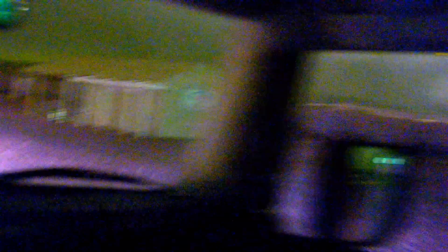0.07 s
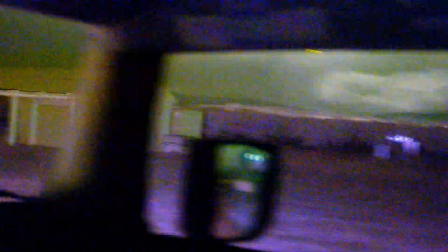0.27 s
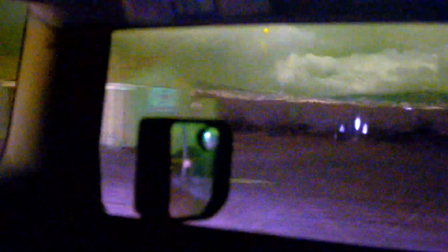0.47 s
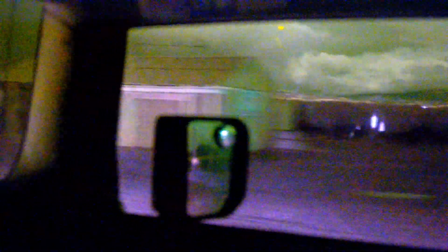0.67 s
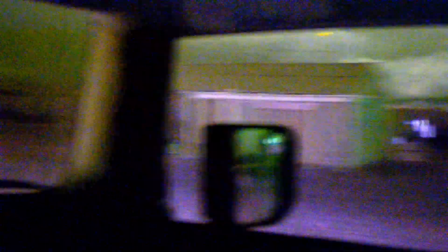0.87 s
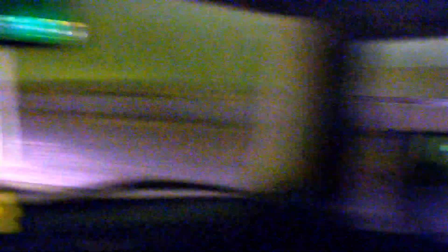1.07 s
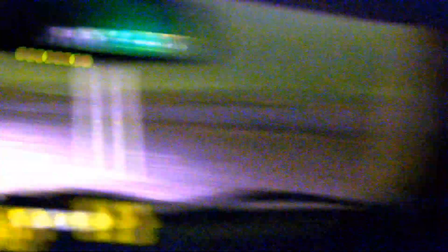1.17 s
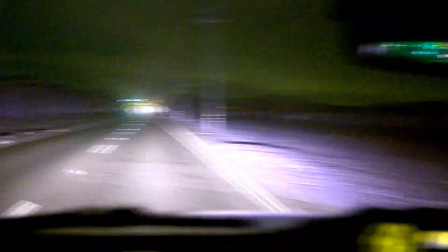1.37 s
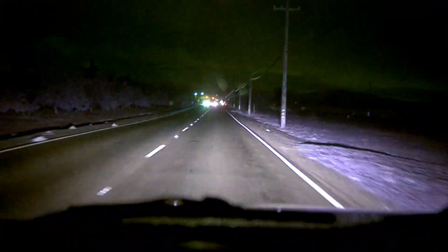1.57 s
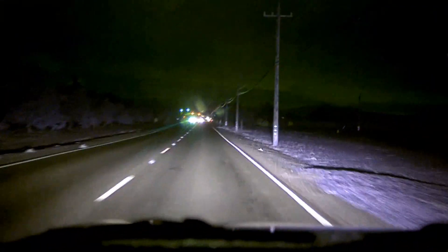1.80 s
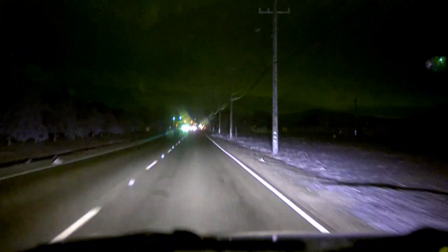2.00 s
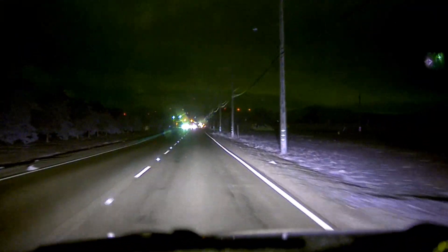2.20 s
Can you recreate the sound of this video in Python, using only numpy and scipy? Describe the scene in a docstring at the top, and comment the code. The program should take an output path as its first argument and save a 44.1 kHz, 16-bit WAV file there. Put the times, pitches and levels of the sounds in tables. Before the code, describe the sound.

Low car engine drone with muffled road and wind noise in a closed cabin, faint fuzzy tyre whine, gentle low thuds, and early light rustles and ticks on a slightly hissy hand-held microphone.

```python
"""Engine orders boom inside a car at road speed, as tones locked to one wandering firing pitch.
Under them lie body rumble and tyre roar with wind hiss, both shaped noise, and soft throbs over bumps.
Resonant noise makes a fuzzy tread whine; a hand rustles, strongest early on, and ticks on the microphone case.
A small hand-held microphone, swung from the side window to the front, adds hiss and limits the band."""
import sys
import numpy as np
from scipy import signal
from scipy.fft import rfft, irfft, next_fast_len
from scipy.io import wavfile
from scipy.ndimage import uniform_filter1d

SR = 44100
rng = np.random.default_rng(int(sys.argv[2]) if len(sys.argv) > 2 else 0)


def natural_amplitude(level_db):
    """Convert a level in decibels to a linear amplitude factor, elementwise."""
    exponent = np.asarray(level_db, float) / 20
    return 10 ** exponent


def to_wav(sig):
    """Store sig (one row per channel, or 1-D mono) as 16-bit WAV at the path in sys.argv[1].

    Samples outside -1..1 are clipped; the rate is SR.
    """
    pcm = np.clip(np.atleast_2d(sig), -1, 1) * 32767
    pcm = np.round(pcm).astype(np.int16)
    wavfile.write(sys.argv[1], SR, pcm.T)  # frames by channels


N = 98916  # length in samples


def evened(x):
    """Scales a signal to rms 1."""
    return x / np.sqrt(np.mean(x ** 2) + 1e-20)


def column(table, index):
    """One column of a time table, interpolated for every sample."""
    rows = np.array(table, float)
    return np.interp(np.arange(N) / SR, rows[:, 0], rows[:, index])


def read(points, hz):
    """Reads a spectrum curve at the frequencies hz, interpolating along log frequency."""
    f, value = np.transpose(points)
    return np.interp(np.log(hz + 1), np.log(f + 1), value)


def coloured(colour):
    """Steady noise of the given spectrum, rms 1."""
    size = next_fast_len(N)
    gain = natural_amplitude(read(colour, np.fft.rfftfreq(size, 1 / SR)))
    noise = irfft(rfft(rng.standard_normal(size)) * gain, size)
    return evened(noise[:N])


def drift(top_hz):
    """Slow random movement from sines up to top_hz, the slower ones stronger; rms 1."""
    t = np.arange(N) / SR
    rates_hz = top_hz * np.geomspace(.05, 1, num=20)
    return evened(sum(np.sin(2 * np.pi * (f * t + rng.random())) / np.sqrt(f) for f in rates_hz))


def resonate(x, hz, width_hz):
    """A resonance of gain 1 that follows hz: shift down to zero frequency, smooth, shift back."""
    turn = np.exp(2j * np.pi * np.cumsum(hz * np.ones(len(x))) / SR)
    r = np.exp(-np.pi * width_hz / SR)
    smooth = signal.lfilter([1 - r], [1, -r], x / turn)
    return 2 * (turn * smooth).real


def engine():
    """Firing tone, its half and faint crankshaft orders share one rotation; each wavers in level."""
    # Engine boom, which dips while the microphone faces the side:
    # (time [s], firing tone [Hz], its level [dB], half tone level [dB])
    boom = [(0, 129.6, -34, -21.5), (.2, 130.1, -27, -26.5), (.45, 129.4, -29, -29.5),
            (.7, 129.5, -33, -28.5), (.95, 129.4, -36, -32.5), (1.15, 128.3, -37.5, -28),
            (1.3, 129, -37, -38.5), (1.45, 128.4, -27.5, -31), (1.7, 129.4, -25.5, -27.5),
            (1.9, 128.6, -24, -27), (2.05, 128.6, -25, -22.5), (2.24, 124, -23.5, -47)]
    # Faint crankshaft orders: (multiple of the firing tone, level [dB])
    faint_orders = [(.75, -40), (1.249, -48.5)]
    waver_db, half_waver_db, faint_waver_db = 1.0, 2.5, 3  # rms
    turns = np.cumsum(column(boom, index=1)) / SR

    def tone(multiple, db):
        phase = 2 * np.pi * (multiple * turns + rng.random())
        return np.sqrt(2) * natural_amplitude(db) * np.sin(phase)

    firing = tone(1, column(boom, index=2) + waver_db * drift(12))
    half = tone(.5, column(boom, index=3) + half_waver_db * drift(15))
    faint = sum(tone(k, db + faint_waver_db * drift(6)) for k, db in faint_orders)
    return firing + half + faint


def rumble():
    """The body shakes more or less as the road surface passes: low noise with a drawn level."""
    # Body rumble over the road surface: (time [s], level [dB])
    surface = [(0, -21.5), (.12, -26.5), (.27, -23.5), (.41, -30), (.49, -23), (.56, -27.5), (.68, -25.5),
               (.85, -26.5), (.94, -29.5), (1.04, -24.5), (1.16, -25), (1.29, -33.5), (1.4, -27),
               (1.47, -44.5), (1.57, -24.5), (1.68, -29), (1.85, -22), (1.96, -31), (2.1, -25), (2.24, -18)]
    # Rumble spectrum: (frequency [Hz], relative density [dB per Hz])
    body_colour = [(3, -17), (10, -15), (18, 0.5), (35, 6.5), (48, 5.5), (56, -4), (65, -4), (74, -12),
                   (90, -26), (150, -71.5)]
    shake = coloured(body_colour)
    # Even out most of the noise's own swelling, so that the drawn level leads
    shake = shake / (uniform_filter1d(shake ** 2, size=3000) + .1) ** .4
    return natural_amplitude(column(surface, index=1)) * evened(shake)


def throbs():
    """Each bump swings the body for a cycle or two: a low sine under a short bell-shaped envelope."""
    # Soft throbs over bumps: (time of the envelope peak [s], its level [dB], pitch [Hz])
    bumps = np.array([(0.027, -15.5, 28.2), (.755, -15, 42), (1.211, -14.5, 37.96), (1.375, -15.5, 44.5),
                      (2.075, -16, 45), (2.118, -16.5, 42.06)])
    rise_s, fall_s = .014, .018  # from the peak to 1/e
    t = np.arange(N)[None] / SR - bumps[:, :1]
    db, hz = bumps[:, 1:2], bumps[:, 2:]
    shape = np.exp(-(t / np.where(t < 0, rise_s, fall_s)) ** 2)
    swing = np.sin(2 * np.pi * (hz * t + rng.random((len(t), 1))))
    return (natural_amplitude(db) * shape * swing).sum(0)


def roar():
    """Tyre and wind noise whose spectrum drifts in patches, with a slow swell and a treble flicker."""
    # Tyre roar and wind through the cabin: (frequency [Hz], relative density [dB per Hz])
    cabin_colour = [(30, -22), (70, -2.5), (85, -2), (100, 2.5), (118, 1.5), (145, -5.5), (175, -7.5),
                    (200, -6), (260, -9.5), (370, -11), (600, -19), (800, -21), (1000, -25), (1650, -31.5),
                    (2800, -34), (3500, -31), (3900, -31.5), (4300, -37), (4700, -45), (5200, -49.5),
                    (6200, -52.5), (9000, -100)]
    level_db = -32.5  # before the swell
    patchy_db, swell_db, flicker_db = 0.5, 1.1, 1  # rms
    frames, hz = N // 256 + 8, np.fft.rfftfreq(1024, 1 / SR)
    patches = uniform_filter1d(rng.standard_normal((frames, 513)), size=14, axis=0)  # over time
    patches = evened(uniform_filter1d(patches, size=12, axis=1))  # over frequency
    # One random step per frame, shared by all frequencies and at full depth from 2 kHz up
    flicker = rng.standard_normal((frames, 1)) * np.clip(hz / 2000, 0, 1)
    field = natural_amplitude(patchy_db * patches + flicker_db * flicker).T
    z = signal.stft(np.pad(coloured(cabin_colour), (0, 1024)), nperseg=1024, noverlap=768)[2]
    x = signal.istft(z * field[:, :z.shape[1]], nperseg=1024, noverlap=768)[1][:N]
    return natural_amplitude(level_db + swell_db * drift(3)) * evened(x)


def whine():
    """Tread blocks sing a fuzzy note: noise through two resonances on one wandering pitch."""
    # Tread whine: (time [s], centre pitch [Hz], level [dB])
    tread = [(0, 743, -49.5), (.4, 740, -51), (.75, 730, -48), (1.1, 715, -49.5), (1.5, 763, -47.5),
             (1.7, 787, -47), (1.95, 758, -50.5), (2.24, 786, -46.5)]
    width_hz, wander_hz = 70, 14  # first resonance; rms wander
    hz = column(tread, index=1) + wander_hz * drift(10)
    note = resonate(rng.standard_normal(N), hz, width_hz)
    note = resonate(note, hz, 2 * width_hz)
    return natural_amplitude(column(tread, index=2)) * evened(note)


def hand():
    """Skin grains and a few soft ticks ring the resonances of the microphone case."""
    # Rustle of the hand on the case: (time [s], level [dB])
    rustle = [(0, -54.5), (.06, -54.5), (.14, -60), (.22, -51), (.27, -55.5), (.38, -53), (.55, -59),
              (.68, -67), (2.24, -72.5)]
    # Case resonances: (frequency [Hz], width [Hz], relative level [dB])
    modes = [(3820, 540, 11.5), (3600, 480, -1.5), (2500, 1300, -6)]
    # Ticks, noise bursts played at half this amplitude: (time [s], level [dB])
    taps = [(0.0644, -38), (0.173, -37.5), (0.207, -38), (0.2243, -36.5), (0.3341, -36), (0.3634, -38),
            (0.3856, -39), (0.5934, -41.5), (1.149, -39), (1.5694, -40.5)]
    grains_per_s, spread_db = 1500, 2  # on average; mean rise of a grain before its cap
    top_hz, tick_s = 4500, 0.0034
    grains = natural_amplitude(spread_db * np.minimum(rng.exponential(1, N), 4))
    grains *= rng.random(N) < grains_per_s / SR
    grains *= rng.choice([-1., 1.], N)
    t, push = np.arange(N) / SR, rng.standard_normal(N)
    # Each bell-shaped tick peaks half its length after the listed time
    ticks = sum(natural_amplitude(db) * np.exp(-(2 * (t - s - tick_s / 2) / tick_s) ** 2) for s, db in taps)
    dull = signal.butter(4, top_hz, fs=SR, output="sos")

    def case(x):
        ring = sum(natural_amplitude(db) * resonate(resonate(x, hz, w), hz, 2 * w) for hz, w, db in modes)
        return signal.sosfilt(dull, ring)

    gain = 1 / np.std(case(push))  # the case passes steady noise at its own level
    return gain * case(natural_amplitude(column(rustle, index=1)) * evened(grains) + .5 * ticks * push)


def scene():
    """Sums the car's sounds and the hand into one channel."""
    return (engine() + rumble() + throbs() + roar() + whine() + hand())[None]


def top_cut(x):
    """Nothing passes above the cut-off."""
    return signal.sosfilt(signal.butter(12, 14800, fs=SR, output="sos"), x)


def record(dry):
    """The microphone adds self-noise, limits the band and shifts the signal by a small offset."""
    # Self-noise spectrum: (frequency [Hz], relative density [dB per Hz])
    hiss_colour = [(1000, 5), (4000, -2), (7300, 10), (12000, -0.5)]
    # Band limit of the microphone: (frequency [Hz], gain [dB])
    band_gain = [(7200, 0), (7900, -5.5), (8300, -14.5), (8700, -30.5), (9000, -36.5), (11000, -34)]
    hiss_db, offset = -65, -.0014  # hiss before the band limit; offset in full scale
    size = next_fast_len(N + 2048)
    noisy = dry + natural_amplitude(hiss_db) * coloured(hiss_colour)
    limited = rfft(noisy, size) * natural_amplitude(read(band_gain, np.fft.rfftfreq(size, 1 / SR)))
    heard = irfft(limited, size)[:, :N] + offset
    return top_cut(heard)


dry = scene()
out = record(dry)
to_wav(out)
```